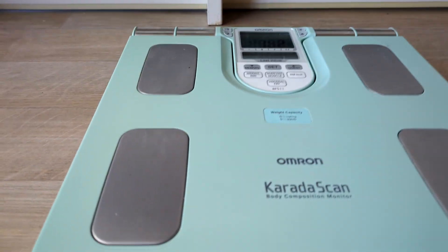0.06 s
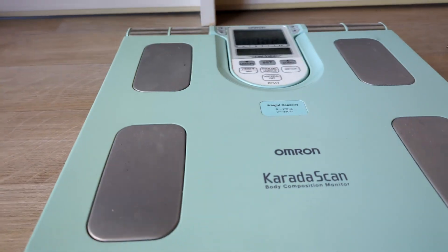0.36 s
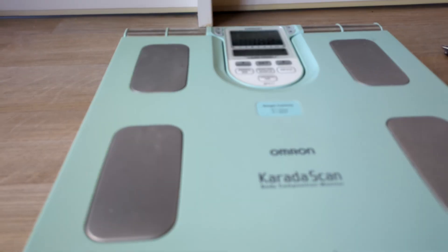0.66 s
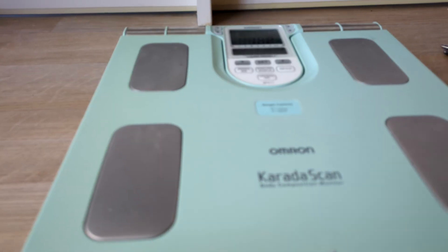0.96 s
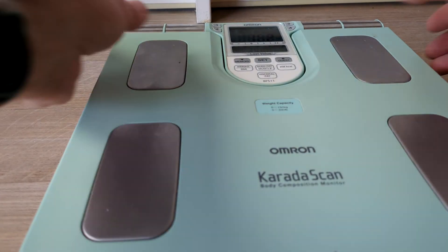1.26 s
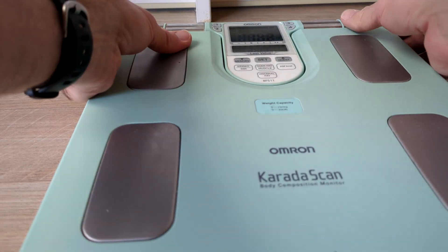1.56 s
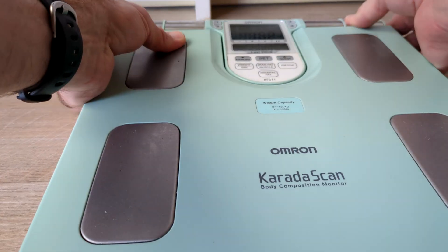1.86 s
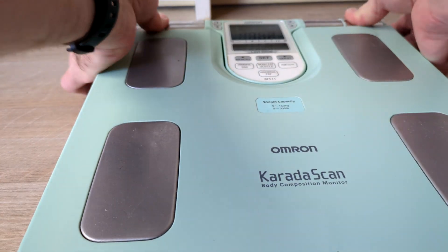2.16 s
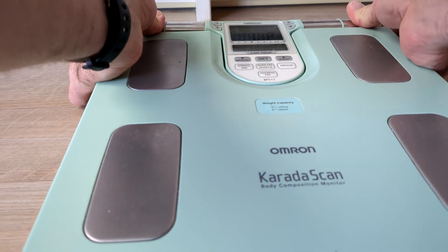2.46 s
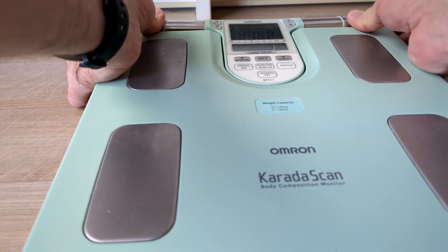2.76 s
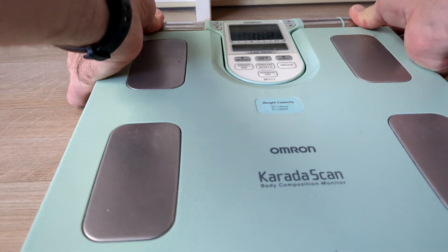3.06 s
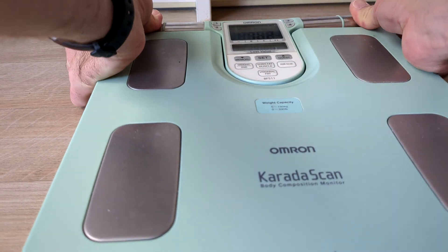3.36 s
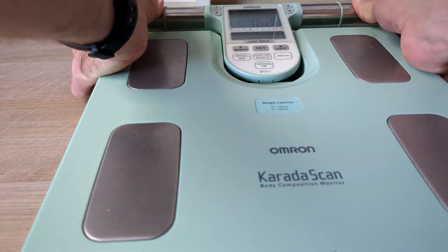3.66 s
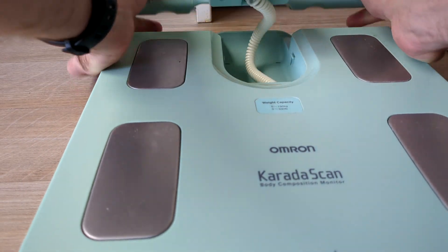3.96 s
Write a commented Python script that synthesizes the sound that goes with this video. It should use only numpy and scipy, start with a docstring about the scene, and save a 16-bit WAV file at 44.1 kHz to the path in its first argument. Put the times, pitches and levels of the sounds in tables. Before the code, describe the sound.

Handling knocks and clicks on a plastic scale, ending in a loud clattering pop.

```python
"""Hands take hold of a plastic bathroom scale on a wooden floor in a small room, close to a microphone.
First a sleeve brushes past and fingers bump the case, exciting damped vibrations in it and the floor.
Then the strained plastic ticks and creaks by stick-slip friction, and at 2.75 s a catch lets go with a
sharp clack. Near 3.4 s the display unit jerks in its seat, sending bending waves along the case;
at 3.6 s it pops loose and clatters, overloading the microphone. A few last ticks follow."""
import sys
import numpy as np
from scipy import signal
from scipy.fft import rfft, irfft, next_fast_len
from scipy.io import wavfile
from scipy.ndimage import map_coordinates

SR = 44100
rng = np.random.default_rng(int(sys.argv[2]) if len(sys.argv) > 2 else 0)


def log_audio(samples):
    """Write samples as a 16-bit WAV file to the path given in sys.argv[1]."""
    # one column per channel
    frames = np.atleast_2d(samples).T
    # limit to full scale, then quantise
    limited = np.clip(frames, -1, 1)
    pcm = np.round(limited * 32767).astype(np.int16)
    wavfile.write(sys.argv[1], SR, pcm)


N = 176400
AGE = np.arange(SR // 2) / SR  # seconds since a contact
CLACK_WET_DB, KNOCK_WET_DB, TICK_WET_DB, CREAK_WET_DB = -5.5, -10, -14.5, -10.5  # room tail over direct


# hard blows in the case: start_s, thud_db, panel_db, display_db, crack_db
CLACKS = [(2.7459, -52, 1, -18, -12.5), (2.749, -19, -5, -11.5, -22), (3.589, -19, -10, -44, -30),
          (3.5981, -37, -22, -12, -28.5), (3.6173, -45, -16, -3, -46), (3.6207, -25, -2, -4.5, -18.5),
          (3.626, -17.5, -1.5, -2, -28), (3.635, -10, -2.5, -13, -19.5), (3.648, -24, -4, -4, -8.5),
          (3.6504, -14.5, -15, -5.5, -11), (3.6595, -10.5, -43, -21, -17), (3.6678, -15, -8.5, -5, -19.5)]
def clacks():
    """Impact excitation: each blow cracks and sets the panel, display unit and floor vibrating."""
    out = np.zeros(N)
    for start_s, thud_db, panel_db, display_db, crack_db in CLACKS:
        blow = amp(panel_db) * panel_ring() + amp(display_db) * display_clatter()
        blow += amp(thud_db) * floor_thud(attack_s=0.0043)
        add(out, start_s, in_room(blow, CLACK_WET_DB) + amp(crack_db) * crack())
    return out


# panel modes: pitch_hz, level_db, t60_s
PANEL_MODES = [(402, -1, 0.036), (389.2, -21, 0.43), (447, -11.5, 0.034), (550, -21, 0.11),
               (670, 0, 0.0042), (1067, -4, 0.015), (1824, -12, 0.014), (2237, -24, 0.045),
               (3150, -30, 0.059)]
PANEL_CUT_HZ = 288  # the small panel radiates little below this
def panel_ring(sharp_share=0.21, relax_s=0.002):
    """Nonlinear plate vibration: the bent panel starts sharp and relaxes to its natural frequencies."""
    warped_age = AGE + sharp_share * relax_s * (1 - np.exp(-AGE / relax_s))
    return high_pass(ring(PANEL_MODES, attack_s=0.00096, age=warped_age), PANEL_CUT_HZ, order=2)


# display unit modes: pitch_hz, level_db, t60_s
DISPLAY_MODES = [(691, -17, 0.099), (817, -24, 0.05), (830, -34, 0.075), (977, -17.5, 0.057),
                 (1137, -21, 0.31), (1370, -19.5, 0.063), (1670, -15, 0.0096), (2060, -17, 0.029)]
# spectrum of loose parts clattering: frequency_hz, level_db
CLATTER_SPECTRUM = [(150, 0), (400, 9), (750, 8), (1100, 6.5), (1800, -6), (3200, -11), (5000, -17),
                    (10000, -23)]
def display_clatter():
    """Free vibration: a few distinct modes of the display unit ring over a dense clatter."""
    return ring(DISPLAY_MODES, attack_s=0.0006) + amp(-3) * burst(CLATTER_SPECTRUM, t60_s=0.035)


# wooden floor modes: pitch_hz, level_db, t60_s
FLOOR_MODES = [(68, -7, 0.048), (93, 6, 0.039), (114.2, -2, 0.12), (151.6, -6, 0.13)]
def floor_thud(attack_s):
    """Structure-borne sound: a blow passes through the feet into the low modes of the floor."""
    return ring(FLOOR_MODES, attack_s)


# spectrum of a crack: frequency_hz, level_db
CRACK_SPECTRUM = [(800, -40), (2500, 11.5), (4500, 6), (6500, 3.5), (9000, 5), (13000, 8.5), (16000, -7)]
def crack():
    """Broadband transient: a brief contact radiates treble, and the room answers diffusely."""
    direct = burst(CRACK_SPECTRUM, t60_s=0.015)
    return direct + amp(-24) * burst(CRACK_SPECTRUM, t60_s=0.36, attack_s=0.011)


# hands bumping the case: start_s, level_db, pitch_hz, thud_db
KNOCKS = [(0.094, -33.5, 285, -52), (0.235, -28.5, 332, -53), (0.244, -29.5, 285, -37),
          (0.3, -26, 365, -34), (0.32, -62, 386, -42), (0.425, -33.5, 315, -78), (.441, -38.5, 296, -53),
          (1.484, -75, 346, -39.5), (1.7, -9.5, 952, -23.5), (1.7014, -19, 464, -54),
          (1.7078, -22.5, 313, -40), (1.923, -40.5, 786, -98), (2.011, -39, 402, -34),
          (2.076, -37, 520, -55), (2.284, -34.5, 544, -41), (2.364, -36.5, 464, -62),
          (2.661, -31.5, 540, -65), (2.987, -27.5, 400, -32), (3.074, -29.5, 600, -31),
          (3.102, -54, 403, -41), (3.225, -24, 309, -31), (3.324, -30, 393, -24.5),
          (3.342, -26.5, 396, -62), (3.434, -28, 474, -38), (3.486, -46, 490, -30)]
def knocks(attack_cycles=0.27, t60_cycles=11.1):
    """Damped oscillation: under the hand the case rings briefly, at a pitch set by the spot touched."""
    out = np.zeros(N)
    for start_s, level_db, pitch_hz, thud_db in KNOCKS:
        onset = (1 - np.exp(-AGE * pitch_hz / attack_cycles)) ** 2
        tone = np.sin(2 * np.pi * pitch_hz * AGE) * fade(t60_cycles / pitch_hz) * onset
        loose_parts = amp(-18.5) * burst(CLATTER_SPECTRUM, t60_s=0.028, attack_s=0.001)
        knock = amp(level_db) * (tone / np.abs(tone).max() + loose_parts)
        thud = amp(thud_db) * floor_thud(attack_s=0.0079)
        add(out, start_s, in_room(knock + thud, KNOCK_WET_DB))
    return out


# modes of the strained case: pitch_hz, level_db, t60_s
CASE_MODES = [(435, 2, 0.056), (638, -3, 0.07), (715, -1.5, 0.075), (1100, -3.5, 0.041), (1970, 0, 0.023),
              (2197, 0.5, 0.018)]
# spectra of a dull click and a bright snap: frequency_hz, level_db
CLICK_SPECTRUM = [(200, 3), (600, 5.5), (1200, 1.5), (2000, 7), (3100, -1.5), (4300, -7.5), (7000, -15.5),
                  (10000, -28), (15000, -66)]
SNAP_SPECTRUM = [(1500, 8.5), (4000, 5.5), (6000, 7), (8500, 6.5), (11000, -2), (15500, -4.5)]
# single slips of strained plastic: start_s, relative_click_db, relative_snap_db
TICKS = [(0.4475, -30.5, -42.5), (0.607, -34.5, -50.5), (1.0504, -42, -51.5), (1.7096, -30.5, -70),
         (1.8151, -47, -50.5), (2.0408, -42, -41), (2.089, -49, -40), (2.1237, -28, -48),
         (2.235, -54, -50.5), (2.4365, -33, -47.5), (2.5071, -59, -41.5), (2.5194, -60, -42),
         (2.5947, -37, -50), (2.6998, -23, -44.5), (2.8833, -17.5, -58), (2.9305, -11, -48.5),
         (2.9475, -19, -64), (2.9813, -19, -41), (2.9945, -26, -42), (3.0693, -11, -42),
         (3.0804, -21.5, -38.5), (3.096, -18.5, -35.5), (3.1292, -18.5, -42), (3.1574, -17.5, -43),
         (3.2232, -19, -40), (3.3409, -32.5, -55), (3.366, -74, -49.5), (3.437, -62, -54),
         (3.7853, -23, -38.5), (3.9169, -29, -49), (3.9413, -22.5, -51), (3.982, -34, -49)]
def ticks(click_gain_db=-8.5, snap_gain_db=4):
    """Strain release: plastic parts slip, with a click that rings the case and a bright snap."""
    out = np.zeros(N)
    for start_s, click_db, snap_db in TICKS:
        click = burst(CLICK_SPECTRUM, t60_s=0.036, attack_s=0.00062)
        click += amp(-9) * ring(CASE_MODES, attack_s=0.0025)
        snap = burst(SNAP_SPECTRUM, t60_s=0.025, attack_s=0.00066)
        tick = amp(click_db + click_gain_db) * click + amp(snap_db + snap_gain_db) * snap
        add(out, start_s, in_room(tick, TICK_WET_DB))
    return out


# jerks of the display unit in its seat: start_s, level_db, travel_s
JERKS = [(3.4238, -28, 0.0032), (3.449, -30, 0.0035), (3.4612, -28.5, 0.0029), (3.4709, -31, 0.0035),
         (3.4917, -30, 0.00278), (3.581, -22, 0.009)]
def jerks(top_hz=3173, rise_share=0.43):
    """Dispersion: higher bending waves travel faster, so each jerk arrives as a falling chirp."""
    out = np.zeros(N)
    for start_s, level_db, travel_s in JERKS:
        cycles = top_hz * travel_s * AGE / (AGE + travel_s)
        onset = 1 - np.exp(-AGE / (rise_share * travel_s))
        chirp = np.sin(2 * np.pi * cycles) * fade(t60_s=0.055) * onset
        wave = high_pass(chirp, PANEL_CUT_HZ, order=2) + amp(-5) * ring(CASE_MODES, attack_s=travel_s)
        add(out, start_s, amp(level_db) * in_room(wave, CLACK_WET_DB))
    return out


# brief pitched pings, faint near 1.8 kHz early on, loud at the clacks: start_s, level_db, pitch_hz
PINGS = [(0.4475, -32, 1757), (0.5442, -38, 1880), (1.812, -37, 1560), (2.7457, 1, 1073),
         (3.218, -26, 3070), (3.6175, -5, 1540)]
def pings(t60_s=0.017, overtone_ratio=2.056, overtone_db=-10.5):
    """Damped oscillation: each ping is a fundamental and one inharmonic overtone, dying quickly."""
    out = np.zeros(N)
    for start_s, level_db, pitch_hz in PINGS:
        modes = [(pitch_hz, level_db, t60_s), (pitch_hz * overtone_ratio, level_db + overtone_db, t60_s)]
        add(out, start_s, in_room(ring(modes, attack_s=0.00045), TICK_WET_DB))
    return out


# creaks as the case is prised open: start_s, length_s, level_db
CREAKS = [(2.719, 0.031, -30.5), (2.886, 0.02, -33.5), (2.963, 0.027, -35), (3.062, 0.035, -37.5),
          (3.214, 0.006, -34), (3.581, 0.038, -23)]
def creaks():
    """Stick-slip friction: a strained joint drives the case modes with a rapid run of slips."""
    out = np.zeros(N)
    for start_s, length_s, level_db in CREAKS:
        case = ring(CASE_MODES, attack_s=0.0016) + amp(-3) * burst(CLICK_SPECTRUM, t60_s=0.036)
        creak = slips(length_s, case, mean_per_s=328)
        add(out, start_s, amp(level_db) * in_room(creak, CREAK_WET_DB))
    return out


# fingertips scuffing the plastic: start_s, length_s, level_db
SCUFFS = [(1.478, 0.38, -67.5), (2.031, 0.12, -57.5), (2.208, 0.057, -57.5), (2.425, 0.1, -65)]
def scuffs():
    """Sliding friction: tiny bright slips under a fingertip come so fast that they merge into noise."""
    out = np.zeros(N)
    grain_spectrum = amp(along(SNAP_SPECTRUM, np.fft.rfftfreq(64, 1 / SR)))
    grain = np.fft.fftshift(irfft(grain_spectrum))
    for start_s, length_s, level_db in SCUFFS:
        scuff = slips(length_s, grain, mean_per_s=1360)
        add(out, start_s, amp(level_db) * in_room(scuff, TICK_WET_DB))
    return out


# spectrum of brushing cloth: frequency_hz, level_db
SLEEVE_SPECTRUM = [(60, -7), (300, 6.5), (700, 5.5), (1300, 0.5), (2800, -1), (4500, -11.5), (9000, -15.5),
                   (15000, -21.5)]
def sleeve(centre_s=0.18, half_hold_s=0.03, peak_db=-42.5, rise_db_per_s=150, fall_db_per_s=202):
    """Friction noise of cloth: it swells, holds and fades as the sleeve brushes past."""
    t = np.arange(N) / SR - centre_s
    before_db = rise_db_per_s * np.maximum(-t - half_hold_s, 0)
    after_db = fall_db_per_s * np.maximum(t - half_hold_s, 0)
    return amp(peak_db - before_db - after_db) * noise(SLEEVE_SPECTRUM, N)


# strength of the rubbing: time_s, level_db
RUB_LEVELS = [(0, -52), (.4, -52), (.8, -61), (1.2, -76.5), (1.45, -60), (1.9, -53.5), (2.1, -50),
              (2.5, -49.5), (2.63, -59.5), (2.8, -35), (3.0, -49), (3.3, -46.5), (3.47, -48.5), (3.55, -53),
              (3.8, -41), (4, -44)]
# spectrum of skin rubbing plastic: frequency_hz, level_db
RUB_SPECTRUM = [(25, -53), (60, 5), (120, 8), (220, -7), (420, -2.5), (800, -13), (2000, -16), (4000, -33),
                (15000, -43)]
def rubbing(uneven_db=3, knots_per_s=28):
    """Amplitude-modulated friction noise: the hands shift unevenly on the case."""
    t = np.arange(N) / SR
    level_db = np.interp(t, *np.transpose(RUB_LEVELS))
    knots = rng.standard_normal(int(N * knots_per_s / SR) + 4)
    wobble = map_coordinates(knots, [t * knots_per_s])
    return amp(level_db + uneven_db * wobble) * noise(RUB_SPECTRUM, N)


# spectrum of the room's hiss: frequency_hz, level_db
HISS_SPECTRUM = [(25, -43), (70, 10.5), (130, -5), (300, -4), (800, -16), (1800, 0), (5000, -11.5),
                 (8000, -14), (11000, -35), (16000, -45)]
def room_hiss(level_db=-66.5):
    """Stationary noise: the room hisses faintly and steadily."""
    return amp(level_db) * noise(HISS_SPECTRUM, N)


# reverberation time of the room: frequency_hz, t60_s
ROOM_DECAY = [(80, 0.17), (250, 0.32), (600, 0.4), (1500, 0.5), (4000, 0.53), (10000, 0.42), (16000, 0.15)]
# spectrum of the reverberation: frequency_hz, level_db
ROOM_SPECTRUM = [(60, 7), (150, 8), (400, 2.5), (650, -7.5), (1050, -3), (2500, -0.5), (6000, 2),
                 (14000, 2)]
def in_room(x, wet_db, delay_s=0.0051, build_s=0.00067):
    """Reverberation: a diffuse tail follows the direct sound, each band decaying at its own rate."""
    hz, t, bands = signal.stft(rng.standard_normal(len(AGE)), SR, nperseg=256)
    decay = np.exp(-np.log(1000) * t / along(ROOM_DECAY, hz)[:, None])
    colour = amp(along(ROOM_SPECTRUM, hz))[:, None]
    onset = 1 - np.exp(-np.maximum(AGE - delay_s, 0) / build_s)
    tail = signal.istft(bands * decay * colour, SR, nperseg=256)[1][:len(AGE)] * onset
    return x + amp(wet_db) * signal.fftconvolve(x, tail / np.linalg.norm(tail))[:len(x)]


def ring(modes, attack_s, scatter_db=4.0, detune=0.01245, age=AGE):
    """Modal superposition: damped sines, varying as the grip shifts; a warped age bends their pitch."""
    out = np.zeros(len(AGE))
    for pitch_hz, level_db, t60_s in modes:
        envelope = amp(level_db + scatter_db * rng.normal()) * fade(t60_s)
        out += envelope * np.sin(2 * np.pi * pitch_hz * (1 + detune * rng.normal()) * age)
    return out * (1 - np.exp(-AGE / attack_s))


def burst(spectrum, t60_s, attack_s=0.0001):
    """Modal overlap: dense ringing after a contact blurs into decaying noise."""
    return noise(spectrum, len(AGE)) * fade(t60_s) * (1 - np.exp(-AGE / attack_s))


def slips(length_s, response, mean_per_s, spread_db=7):
    """Convolution: each uneven slip sounds the response; the energy equals rms 1 over length_s."""
    size = len(AGE)
    stroke = np.sqrt(np.abs(np.sin(np.pi * np.minimum(AGE / length_s, 1))))
    gaps_s = rng.uniform(0.4, 1.6, size=2000) / mean_per_s
    strengths = amp(spread_db * rng.standard_normal(len(gaps_s)))
    impulses = np.bincount((np.cumsum(gaps_s) * SR).astype(int), strengths, size)[:size]
    signs = np.sign(rng.standard_normal(size))
    x = signal.fftconvolve(impulses * stroke * signs, response)[:size]
    return x / np.sqrt(np.sum(x ** 2) / (length_s * SR) + 1e-12)


def noise(spectrum, size):
    """Spectral shaping: white noise coloured and scaled to rms 1."""
    gain = amp(along(spectrum, np.fft.rfftfreq(size, 1 / SR)))
    x = irfft(rfft(rng.standard_normal(size)) * gain, size)
    return x / x.std()


def fade(t60_s):
    """Exponential decay, 60 dB down at t60_s."""
    return np.exp(-np.log(1000) * AGE / t60_s)


def high_pass(x, hz, order):
    """Causal bass cut."""
    return signal.sosfilt(signal.butter(order, hz, "high", fs=SR, output="sos"), x)


def along(points, hz):
    """Interpolation on a logarithmic frequency axis."""
    point_hz, values = np.transpose(points)
    return np.interp(np.log(hz + 1), np.log(point_hz + 1), values)


def amp(db):
    """Decibels to gain."""
    return 10 ** (np.asarray(db) / 20)


def add(track, start_s, x):
    """Superposition: x joins the track at start_s."""
    part = track[round(start_s * SR):][:len(x)]
    part += x[:len(part)]


def scene():
    """Linear superposition: contacts, friction and hiss sum in one channel."""
    contacts = clacks() + knocks() + ticks() + jerks() + pings()
    friction = creaks() + scuffs() + sleeve() + rubbing()
    return (contacts + friction + room_hiss())[None]


def record(dry, top_hz=16300, edge_hz=700):
    """Saturation and band limiting: the microphone drops deep bass, clips and loses the top treble."""
    x = high_pass(dry, hz=50, order=6)
    x = x / (1 + np.abs(x) ** 8) ** (1 / 8)  # soft clip at full scale
    size = next_fast_len(N + SR // 2)
    passband = np.clip((top_hz - np.fft.rfftfreq(size, 1 / SR)) / edge_hz, 0, 1)
    return irfft(rfft(x, size) * np.sin(np.pi / 2 * passband) ** 2, size)[..., :N]


dry = scene()
out = record(dry)
log_audio(out)
```